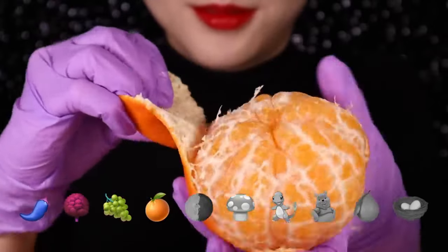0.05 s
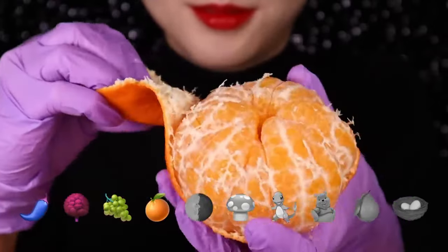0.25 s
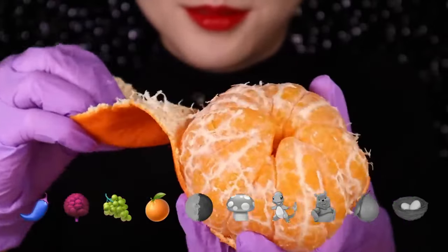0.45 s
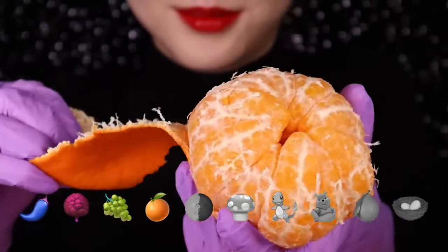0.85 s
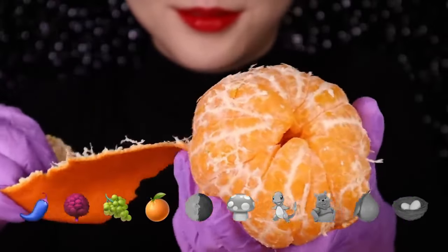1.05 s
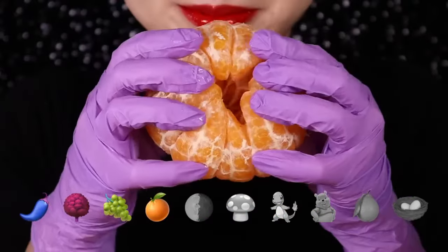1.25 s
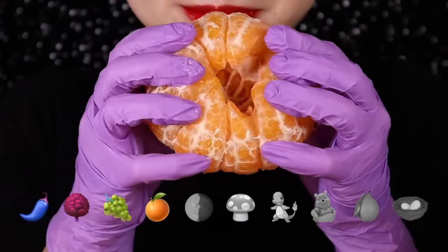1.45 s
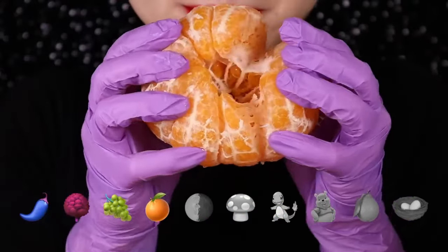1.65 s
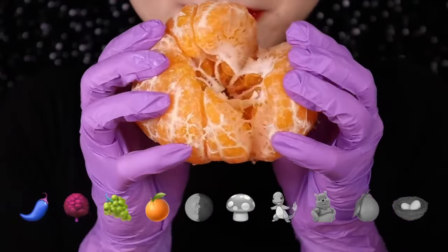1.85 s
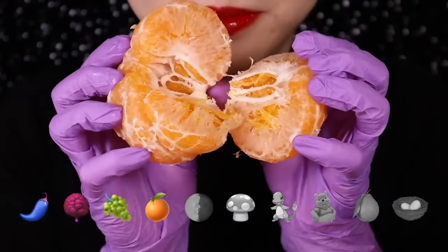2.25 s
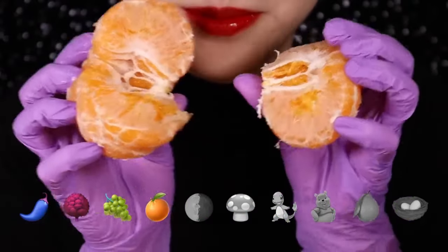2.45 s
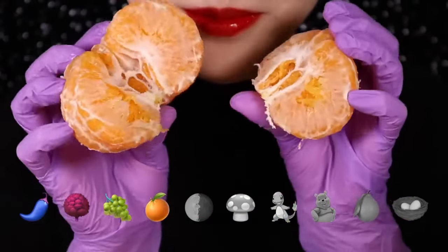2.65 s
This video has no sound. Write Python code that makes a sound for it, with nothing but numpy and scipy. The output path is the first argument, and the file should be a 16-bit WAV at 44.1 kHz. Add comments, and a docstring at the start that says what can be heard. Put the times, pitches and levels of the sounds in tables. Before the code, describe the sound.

Close crackly peeling of a citrus fruit, followed by juicy segments being split by gloved hands.

```python
"""Gloved hands peel a citrus fruit close to two microphones, in a small room with a low rumble and faint hiss.
A glove slides over the rind; then the peel comes off in four pulls, its pith fibres breaking in a dry
crackle with single sharp snaps while the fruit bumps softly in the hand. From 1.3 s the segments are
drawn apart: pockets of juice burst, and wet membranes part with a fine fizz that rings in the hollow
between the halves."""
import sys
import numpy as np
from scipy import signal
from scipy.fft import rfft, irfft, next_fast_len
from scipy.io import wavfile
from scipy.ndimage import uniform_filter1d, map_coordinates

SR = 44100
rng = np.random.default_rng(int(sys.argv[2]) if len(sys.argv) > 2 else 0)


def inscribe(sig):
    """Save sig as 16-bit PCM at rate SR to the path in sys.argv[1].

    A 1-D sig is mono; a 2-D sig holds one channel per row.
    Samples are clipped to [-1, 1] before scaling.
    """
    pcm = np.round(np.clip(np.atleast_2d(sig).T, -1, 1) * 32767)
    wavfile.write(sys.argv[1], SR, pcm.astype(np.int16))


N = 123479
TIME = np.arange(N) / SR
SIZE = next_fast_len(N + 8192, True)
HZ = np.fft.rfftfreq(SIZE, 1 / SR)
PULL_START_S, HOLLOW_WIDTH_HZ = 1.3, 940
PEEL_LAG_MS = 0.045  # the peel is heard at the left microphone first

# gap between the segments: (time [s], hollow resonance [Hz], slit resonance [Hz], ring strength [dB])
GAP = [(1.3, 1540, 5600, -8), (1.51, 1590, 5300, -17), (1.59, 1620, 5730, -7), (1.68, 1810, 5570, -5.5),
       (1.86, 1960, 7000, -16), (2.02, 1770, 7440, -17), (2.16, 1750, 9400, -19), (2.3, 1860, 8400, -17)]


def amp(db):
    """Decibels to gain."""
    return 10 ** (np.asarray(db) / 20)


def unit(x):
    """Scales to rms 1."""
    return x / np.sqrt(np.mean(x ** 2) + 1e-20)


def read(points, hz):
    """Reads a table on a log-frequency axis."""
    f, value = np.transpose(points)
    return np.interp(np.log(hz + 1), np.log(f), value)


def curves(table):
    """Every column of a timed table, sample by sample."""
    times, *columns = np.transpose(table)
    return [np.interp(TIME, times, column) for column in columns]


def add(mix, s, sound):
    """Mixes a sound in at s seconds."""
    part = mix[:, max(round(s * SR), 0):][:, :sound.shape[-1]]
    part += sound[..., :part.shape[1]]


def sides(pan_db):
    """Microphone gains of constant total power; positive is to the left."""
    return unit(amp(np.array([[pan_db], [-pan_db]]) / 2))


def mic_delays(lag_ms, hz):
    """Phase shifts for a sound that reaches the right microphone lag_ms after the left."""
    return np.exp(1j * np.pi * hz * np.array([[lag_ms], [-lag_ms]]) / 1000)


def colour(x, points):
    """Minimum-phase filter with the given spectrum."""
    log_gain = np.log(amp(read(points, abs(np.fft.fftfreq(4096, 1 / SR)))))
    taps = np.fft.ifft(np.exp(np.conj(signal.hilbert(log_gain)))).real[:2048]
    return signal.oaconvolve(x, taps[None], axes=1)[:, :N]


def resonate(x, hz, width_hz, passes=1):
    """A resonance of gain 1 whose pitch follows a curve."""
    turn = np.exp(2j * np.pi * np.cumsum(hz) / SR)
    pole = np.exp(-np.pi * width_hz / SR)
    for _ in range(passes):
        x = 2 * (turn * signal.lfilter([1 - pole], [1, -pole], x / turn)).real
    return x


def noise(likeness):
    """White noise, partly alike at the two microphones."""
    a, b = rng.standard_normal((2, N))
    return np.array([a, likeness * a + np.sqrt(1 - likeness ** 2) * b])


def flutter(rate_hz):
    """A smooth random wobble of rms 1."""
    return unit(irfft(rfft(rng.standard_normal(N), SIZE) * np.exp(-(HZ / rate_hz) ** 2), SIZE)[:N])


def steady(x, window_s):
    """Evens out the slow level and leaves the grain."""
    power = uniform_filter1d((x ** 2).mean(0), int(window_s * SR))
    return x / np.sqrt(abs(uniform_filter1d(power, 200)) + 1e-3 * power.mean())


def swell(x, mids_db, treble_db, window_s):
    """Sets a crackle's level below and above 5500 Hz."""
    mids = irfft(rfft(x, SIZE) / (1 + (HZ / 5500) ** 8), SIZE)[:, :N]
    return steady(mids, window_s) * amp(mids_db) + steady(x - mids, window_s) * amp(treble_db)


def scattered(size):
    """Left and right spectra of a brief spray of splinters and reflections off fruit and fingers."""
    t, hz = np.arange(400) / SR, np.fft.rfftfreq(size, 1 / SR)
    envelope = np.exp(-t / 0.0017) * (1 - np.exp(-t / 0.000077))
    a, b = rfft(unit(rng.standard_normal((2, len(t))) * envelope) / np.sqrt(len(t)), size)
    likeness = 1 / (1 + (hz / 1940) ** 4)  # both microphones hear the same lows
    return np.array([a, likeness * a + np.sqrt(1 - likeness ** 2) * b])


def crackle(per_s, spread_db, q, lag_ms, scatter_ms, scatter_db, families=16):
    """Random tiny breaks of uneven size; each family has its own pitch and place."""
    spectrum = 0
    for centre_hz in np.geomspace(1200, 14000, families):
        chance, size, sign = rng.random((3, N))
        strength = amp(spread_db * np.minimum(-np.log(size + 1e-9), 4.5))
        clicks = (chance < per_s / families / SR) * strength * np.sign(sign - .5)
        direct = mic_delays(lag_ms + scatter_ms * rng.standard_normal(), HZ)
        path = direct + amp(scatter_db) * scattered(SIZE)
        spectrum += rfft(clicks, SIZE) * band(HZ, centre_hz, q) * path
    return irfft(spectrum, SIZE)[:, :N]


def band(hz, centre_hz, q):
    """Response of a damped resonance."""
    s = 1j * hz / centre_hz
    return s / q / (1 + s / q + s * s)


def pull_lag_ms(s):
    """The split starts nearer the right microphone and travels towards the middle."""
    return -.14 * np.interp(s, [1.8, 2.2, 2.3], [1, .75, .15])


def knocks(table, rise_cycles, pan_db):
    """Each row rings one dying mode."""
    out, t = np.zeros((2, N)), np.arange(SR // 2) / SR
    for s, hz, t60, db in table:
        envelope = amp(db - 60 * t / t60) * (1 - np.exp(-t * hz / rise_cycles))
        add(out, s, sides(pan_db) * envelope * np.sin(2 * np.pi * hz * t))
    return out


def background():
    """Room tone: low rumble and faint hiss, a little to the left."""
    # room tone spectrum: (frequency [Hz], relative level [dB])
    floor = [(15, -7.5), (27, -4.5), (38, -8.5), (55, 1.5), (75, -7), (100, -28.5), (160, -14.5),
             (300, -23), (700, -38), (2000, -36), (7000, -45.5), (15500, -53)]
    tone = irfft(rfft(noise(likeness=0.66), SIZE) * amp(read(floor, HZ)), SIZE)[:, :N]
    return amp(-46.5) * sides(pan_db=2) * unit(tone)


def room(x):
    """The short tail of a small damped room."""
    # room decay: (frequency [Hz], t60 [s])
    decay = [(200, 0.22), (2000, 0.17), (7000, 0.14), (15000, 0.089)]
    hz, t, spectra = signal.stft(rng.standard_normal((2, SR // 3)), SR, nperseg=256)
    tail = signal.istft(spectra * amp(-60 * t / read(decay, hz)[:, None]), SR, nperseg=256)[1]
    tail *= np.minimum(np.arange(tail.shape[1]) / SR / 0.0036, 1)
    return signal.fftconvolve(x, tail / np.linalg.norm(tail[0]), axes=1)[:, :N]


def bumps():
    """The fruit jolts in the hand with soft thuds, well to the left."""
    # jolts: (time [s], pitch [Hz], t60 [s], level [dB])
    jolts = [(.24, 168, 0.02, -17), (.395, 140, 0.045, -26), (.532, 116, 0.067, -28), (.64, 80, 0.3, -35),
             (.97, 37.4, 0.4, -29.5), (1.061, 70.5, 0.076, -24), (1.224, 167, 0.02, -25),
             (2.505, 40, 0.17, -28)]
    return knocks(jolts, rise_cycles=0.33, pan_db=11)


def pops():
    """Air pockets and flesh ring briefly when a break knocks them, near the middle; the first, low ring is the
    glove rubbing the rind before the tearing begins."""
    # pocket and flesh modes, the first one a glove rub: (time [s], pitch [Hz], t60 [s], level [dB])
    modes = [(.162, 436, 0.034, -34), (.2402, 544, 0.012, -20), (.2402, 800, 0.0069, -17),
             (.3945, 523, 0.025, -22.5), (.5342, 2950, 0.0076, -16), (.7005, 3000, 0.0042, -9),
             (1.173, 850, 0.013, -23.5), (1.197, 1020, 0.013, -23.5), (1.2256, 960, 0.0043, -16.5),
             (1.5073, 1430, 0.0067, -12), (2.124, 1010, 0.012, -27.5), (2.143, 810, 0.014, -26.5),
             (2.4374, 940, 0.005, -19.5), (2.4377, 1380, 0.0072, -18), (2.511, 1970, 0.0021, -1)]
    return knocks(modes, rise_cycles=0.43, pan_db=1.5)


def squelches():
    """Pockets of juice burst in short splutters that ring the hollow between the halves."""
    # bursting pockets: (time [s], level going into the hollow [dB])
    pockets = [(1.511, -14.5), (1.52, -26), (1.560, -19), (1.572, -21), (1.704, -20.5), (1.719, -19),
               (1.745, -19.5)]
    hollow_hz = curves(GAP)[0]
    bursts = sum(amp(db) * (TIME >= s) * np.exp(-abs(TIME - s) / 0.0044) for s, db in pockets)
    return resonate(noise(likeness=0.89) * bursts, hollow_hz, HOLLOW_WIDTH_HZ, passes=2)


def segments():
    """Wet membranes unstick in a dense, surging fizz; the gap rings in spurts of wandering pitch."""
    # course of the parting, relative levels: (time [s], mids [dB], treble [dB], low body [dB])
    parting = [(1.3, -59, -56, -65), (1.325, -49.5, -50, -45.5), (1.44, -48, -45, -54),
               (1.495, -43.5, -43, -51), (1.515, -38.5, -38, -41), (1.59, -40.5, -38.5, -56),
               (1.658, -39, -35, -47), (1.671, -31, -26, -47.5), (1.69, -35.5, -31, -56),
               (1.74, -36.5, -35.5, -49), (1.79, -40, -37, -48), (1.88, -37, -35.5, -62),
               (1.94, -33, -36.5, -48), (2.02, -40.5, -41.5, -61), (2.07, -38.5, -38.5, -48.5),
               (2.13, -34, -34.5, -58), (2.2, -39.5, -40.5, -42), (2.235, -38.5, -36.5, -58),
               (2.26, -63, -48, -53), (2.3, -49.5, -47, -53), (2.38, -56, -52, -52.5),
               (2.425, -44, -41.5, -52), (2.455, -55, -53, -56), (2.48, -51, -39, -47),
               (2.503, -33, -31.5, -41.5), (2.535, -45, -47, -46), (2.56, -75, -55, -57),
               (2.62, -64, -66, -50), (2.69, -56, -60, -50), (2.735, -52, -59, -44),
               (2.79, -60.5, -60, -60)]
    # spectrum of wet membranes: (frequency [Hz], gain [dB])
    juice = [(200, -21), (700, -2), (1200, -4), (2200, -5), (3200, 5.5), (4500, 4.5), (7500, -2.5),
             (11000, -1), (15500, -6.5)]
    # spectrum of gloves handling the fruit: (frequency [Hz], gain [dB])
    gloves = [(40, -7), (90, 3.5), (180, 3.5), (300, -3), (450, -7.5), (800, -8.5), (1300, -21),
              (3000, -81)]
    mids_db, treble_db, body_db = curves(parting)
    hollow_hz, slit_hz, ring_db = curves(GAP)
    films = crackle(per_s=5000, spread_db=3, q=1.06, lag_ms=0, scatter_ms=.01, scatter_db=-4.5)
    films = colour(films, juice)
    shift = pull_lag_ms(TIME) / 2000 * SR  # half the lag for each microphone, in samples
    films = np.array([map_coordinates(side, [np.arange(N) + way * shift], order=5)
                      for side, way in zip(films, (1, -1))])
    spurts_db, surge_db = 3 * flutter(rate_hz=45), 1.2 * flutter(rate_hz=140)
    hollow_hz, slit_hz = np.array([hollow_hz, slit_hz]) * np.exp(.1 * flutter(rate_hz=70))
    hollow = amp(17.5 + spurts_db) * resonate(films, hollow_hz, HOLLOW_WIDTH_HZ, passes=2)
    slit = amp(4) * resonate(films, slit_hz, width_hz=3000, passes=2)
    shut = np.minimum(2 * amp(ring_db), 1)  # a narrow gap swallows the sound between its two resonances
    films = films - shut * resonate(films, np.sqrt(hollow_hz * slit_hz), width_hz=2500)
    ringing = films + amp(ring_db) * (hollow + slit)
    fizz = swell(ringing, mids_db, treble_db, window_s=0.045) * amp(surge_db)
    body = unit(colour(noise(likeness=0.54), gloves)) * amp(body_db - 4)
    fade_in = np.clip((TIME - PULL_START_S) / 0.014 + 1, 0, 1)
    return (fizz * sides(pan_db=1) + body * sides(pan_db=0.59)) * fade_in


def peel():
    """The glove slides with a hiss; then pith fibres tear in a coarse crackle and shake the flesh."""
    # course of the four pulls, relative levels: (time [s], mids [dB], treble [dB], low body [dB])
    pulls = [(0, -48, -44.5, -46.5), (0.114, -52, -54, -46), (0.119, -43.5, -42, -50),
             (0.17, -44, -39, -36), (0.215, -55, -55.5, -56), (0.25, -39.5, -45, -46),
             (0.285, -47, -42, -43), (0.325, -54, -51, -51), (0.365, -47.5, -51, -86),
             (0.392, -29.5, -37, -40.5), (0.425, -36.5, -36.5, -42), (0.47, -33.5, -34.5, -48),
             (0.51, -35, -43.5, -40), (0.54, -26, -29.5, -35), (0.565, -22, -23, -38.5),
             (0.6, -28.5, -30, -43.5), (0.625, -34, -37.5, -43), (0.665, -32, -35, -44),
             (0.72, -39, -46, -43), (0.745, -29, -38, -56), (0.775, -42.5, -42, -51), (0.82, -53, -60, -66),
             (0.86, -44.5, -52, -46.5), (0.882, -25.5, -34, -45.5), (0.93, -28.5, -30, -40.5),
             (0.975, -32, -32.5, -47.5), (1.02, -37, -39, -49), (1.05, -56, -62, -47.5),
             (1.08, -35, -43, -35.5), (1.105, -49, -46.5, -61), (1.14, -35.5, -32.5, -44),
             (1.19, -30.5, -30.5, -37.5), (1.22, -38, -43.5, -46), (1.252, -43.5, -32, -51),
             (1.28, -55, -57, -49)]
    # spectrum of tearing pith: (frequency [Hz], gain [dB])
    pith = [(200, -40), (500, 3.5), (1000, -6), (1750, 6), (2300, -1), (2900, 3), (5000, 1.5), (7500, -1),
            (10000, -3.5), (15500, -9.5)]
    # spectrum of shaken flesh: (frequency [Hz], gain [dB])
    flesh = [(40, -1), (90, 5.5), (150, 5), (300, -5.5), (520, -7), (800, -9), (1300, -15.5), (3000, -46)]
    mids_db, treble_db, body_db = curves(pulls)
    fibres = crackle(per_s=2600, spread_db=4.5, q=0.67, lag_ms=PEEL_LAG_MS,
                     scatter_ms=0.086, scatter_db=1)
    tearing = np.clip((TIME - 0.19) / .01, 0, 1)  # until 0.19 s the glove only slides over the rind
    texture = unit(fibres) * tearing + noise(likeness=0.13) * (1 - tearing)
    tear = swell(colour(texture, pith), mids_db, treble_db, window_s=0.023)
    body = unit(colour(noise(likeness=0.85), flesh)) * amp(body_db - 1)
    pan_db = np.interp(TIME, [.5, 1.1], [3, 6.5])  # the flap of peel swings to the left
    place = amp(np.array([pan_db, -pan_db]) / 2 - 1.27)
    fade_out = np.clip((PULL_START_S - TIME) / 0.023, 0, 1)
    return (tear * place + body * sides(pan_db=3.8)) * fade_out


def snaps():
    """Thick fibres give way one by one, each in a damped pulse followed by splinters."""
    # breaking fibres: (time [s], energy before colouring [dB], centre [Hz], left minus right [dB])
    breaks = [(0.2401, -6.5, 3300, 5), (0.2403, -0.5, 5160, 1), (0.2654, -16, 5300, 5),
              (0.2823, -0.5, 5360, 3), (0.287, -4, 3700, 1), (0.2936, -6, 4000, 9),
              (0.3103, -4.5, 3540, -2), (0.3113, -6.5, 4600, 22), (0.3384, -18, 5100, 4),
              (0.3804, -5, 4600, 21), (0.3853, -4, 5450, -11), (0.3903, 1, 4500, 16),
              (0.395, -2.5, 4030, -1), (0.4158, -9.5, 2780, -6), (0.4366, -7, 4800, 5),
              (0.448, -7, 4200, -17), (0.4915, -2.5, 3260, 0), (0.5342, 0.5, 3080, 1),
              (0.5535, 4, 5500, 12), (0.567, 5, 5230, 9), (0.5762, -6, 4900, 14), (0.6131, -4, 3880, -2),
              (0.6443, -5.5, 2170, 8), (0.668, -3.5, 4800, -3), (0.6867, -2, 3420, 10),
              (0.7002, -0.5, 4460, 0), (0.7353, -0.5, 3100, 22), (0.7416, -1.5, 3450, -2),
              (0.7539, -1, 3480, 11), (0.8325, -10, 3020, 4), (0.8443, -6.5, 6100, 26),
              (0.8734, 1.5, 3500, 9.5), (0.8842, 0.5, 5740, 2), (0.9034, 3, 4560, 5),
              (0.9237, 1.5, 6650, -4), (0.9581, 1, 4570, 16), (0.9658, 0.5, 4420, 5), (0.9742, 5, 7200, 6),
              (1.001, -4, 3850, 1), (1.0335, 1.5, 6900, 7), (1.0787, -1, 4250, 8.5), (1.0832, -9, 6400, 17),
              (1.15, 1, 8200, 6), (1.178, -3, 7800, 9), (1.2086, -3, 7860, 12), (1.2265, -9, 3200, -9),
              (1.2328, -2.5, 8000, 21), (1.5072, 5, 5520, 3), (1.8735, -4, 4430, -2),
              (1.9036, -12.5, 4400, -3), (2.0503, -6, 4800, 37), (2.1056, -8.5, 9400, -15),
              (2.1805, 1, 9300, -1), (2.2399, -4.5, 8700, -6), (2.2831, 1.5, 7940, 10),
              (2.29, -13.5, 5800, -9), (2.4389, -7.5, 3230, 6), (2.4702, -9, 8400, 12), (2.51, -2, 5330, 6),
              (2.5121, -1.5, 6500, 28), (2.5327, -2.5, 4100, 2)]
    # colouring of all snaps: (frequency [Hz], gain [dB])
    snap_colour = [(60, 24), (200, 16.5), (600, 11.5), (1000, 7.5), (1800, 6.5), (3500, -1.5), (7000, 2),
                   (11000, 2), (15500, -6)]
    out, hz = np.zeros((2, N)), np.fft.rfftfreq(1024, 1 / SR)
    lead_s = 16 / SR  # leaves space ahead of the pulse for the nearer microphone
    lead = np.exp(-2j * np.pi * hz * lead_s)
    for s, energy_db, centre_hz, pan_db in breaks:
        if s < PULL_START_S:
            lag_ms, q = PEEL_LAG_MS, 1
        else:  # a snap inside the barely opened fruit rings longer
            lag_ms, q = pull_lag_ms(s), np.interp(s, [1.5, 1.9], [4.4, 1])
        path = mic_delays(lag_ms, hz) + amp(-3.5) * scattered(1024)
        place = sides(pan_db) ** (hz / (hz + 700))  # the hands shade the treble more than the lows
        recoil = (centre_hz - 1j * hz) / (centre_hz + 1j * hz)  # it swings back as far as it sprang
        low_cut = 1j * hz / (1j * hz + 250 * (centre_hz / 4960) ** 3)  # thinner fibres lose more lows
        pulse = irfft(path * place * recoil * low_cut * band(hz, centre_hz, q) * lead)
        add(out, s - lead_s, unit(pulse) / np.sqrt(pulse.shape[1]) * amp(energy_db - 0.5))
    return colour(out, snap_colour)


def scene():
    """Fruit and hands close up, the room faint behind them."""
    fruit = peel() + segments() + squelches() + snaps() + pops()
    return fruit + amp(-15.5) * room(fruit) + bumps() + background()


def record(dry):
    """The tallest peaks are rounded off; then comes the recorder's band limit."""
    ceiling, edge_hz = .92, 15800
    rounded = dry / (1 + (dry / ceiling) ** 6) ** (1 / 6)
    low_pass = signal.firwin(255, edge_hz, window=("kaiser", 9), fs=SR)
    return signal.oaconvolve(rounded, low_pass[None], "same", axes=1)


dry = scene()
out = record(dry)
inscribe(out)
```